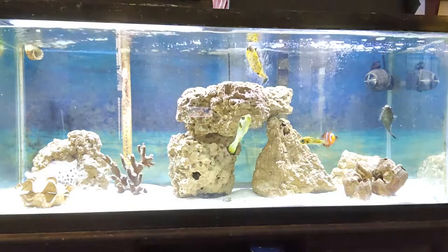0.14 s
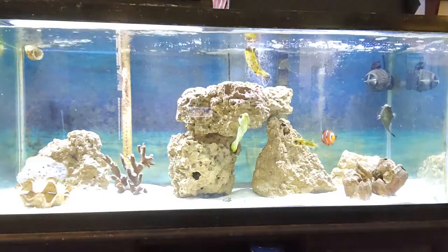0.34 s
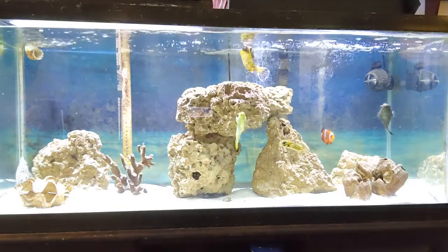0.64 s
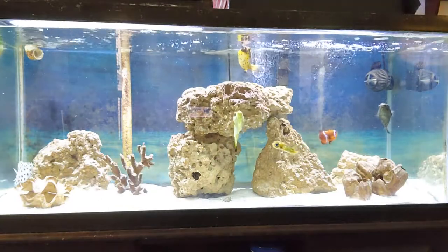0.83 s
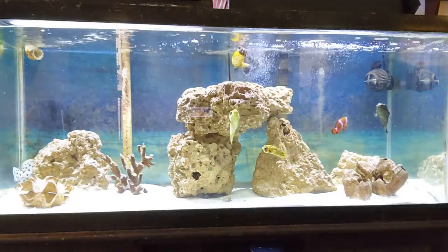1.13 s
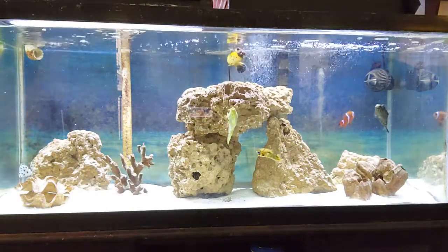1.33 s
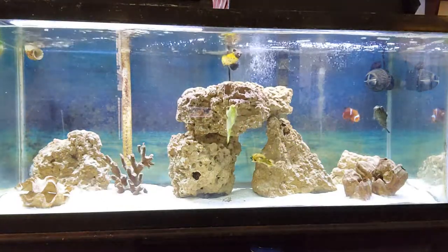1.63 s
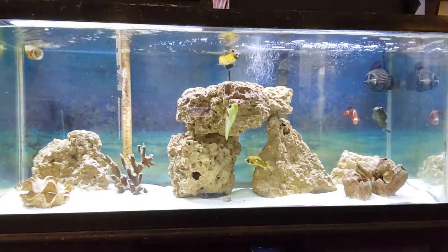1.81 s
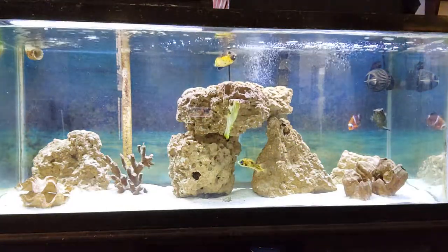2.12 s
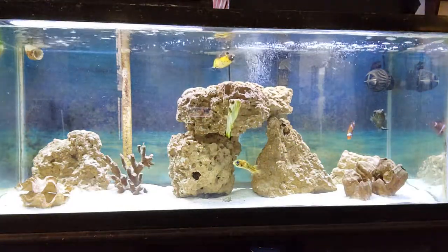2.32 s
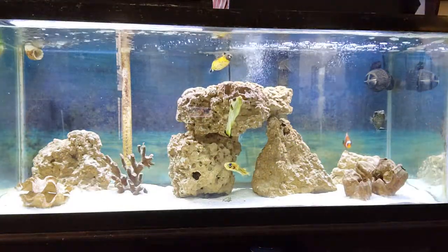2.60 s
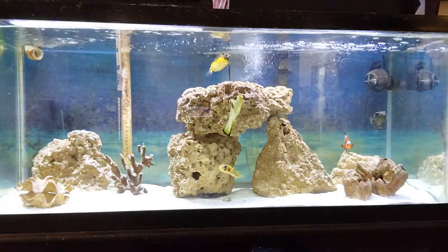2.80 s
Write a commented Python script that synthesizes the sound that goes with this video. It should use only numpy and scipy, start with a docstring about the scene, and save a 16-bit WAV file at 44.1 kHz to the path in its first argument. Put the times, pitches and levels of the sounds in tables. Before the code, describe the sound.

An aquarium pump hums low and steadily throughout, over soft rumble, faint water hiss and trickling small bubbles. Tiny sprays and a drip come in the first 0.3 s. To the right, something hard is set down with a quick rattle at 0.6 s, wood knocks from 1.0 to 1.5 s, and small glass or metal clinks at 1.3-1.5 s. Light drips follow until 2.8 s. Small-room stereo.

```python
"""A fish tank indoors, heard by two microphone ports: pumps hum on the mains over a low rumble all along,
water hisses and small bubbles trickle. Sprays and a drip open the scene; to the right, in the room,
something hard is set down at 0.6 s, wood is knocked from 1.0 s and a small glass or metal thing clinks
from 1.3 s; more drips and a spray end it. Objects ring as decaying modes, bubbles as short rising tones,
hum as steady sines, water and rumble as shaped noise."""
import sys
import numpy as np
from scipy import signal
from scipy.fft import rfft, irfft
from scipy.io import wavfile
from scipy.ndimage import uniform_filter1d

SR = 44100
rng = np.random.default_rng(int(sys.argv[2]) if len(sys.argv) > 2 else 0)


def nominal_scale(level):
    """Amplitude ratio for a level in decibels (scalar or array-like)."""
    x = np.asarray(level, float) / 20
    return 10 ** x


def dump(signal):
    """Clip the signal to [-1, 1] and save it as 16-bit WAV at the path in sys.argv[1]."""
    limited = np.clip(np.atleast_2d(signal).T, -1, 1)
    pcm = np.round(limited * 32767).astype(np.int16)
    wavfile.write(sys.argv[1], SR, pcm)


N = 130095


def evened(x):
    """Scales a signal to rms 1."""
    return x / np.sqrt(np.mean(x ** 2) + 1e-20)


def read(points, hz):
    """Reads a table along a log-frequency axis, flat beyond its ends."""
    f, value = np.transpose(points)
    return np.interp(np.log(hz + 1), np.log(f + 1), value, left=value[0], right=value[-1])


def add(mix, s, sound):
    """Mixes a sound in at a time in seconds."""
    part = mix[..., round(s * SR):][..., :sound.shape[-1]]
    part += sound[..., :part.shape[-1]]


def slow(top_hz, t):
    """Slow random drift of rms 1: sines from 0.3 Hz up, weaker as they get faster."""
    rates = np.geomspace(.3, top_hz, num=20)
    return evened(sum(np.sin(2 * np.pi * (f * t + rng.random())) / np.sqrt(f) for f in rates))


def coloured(points, length):
    """A short piece of noise of rms 1 with a given spectrum."""
    spectrum = rfft(rng.standard_normal(length))
    return evened(irfft(spectrum * nominal_scale(read(points, np.fft.rfftfreq(length, 1 / SR))), length))


# how long the room rings: (frequency [Hz], 60 dB decay time [s])
ROOM_DECAY = [(250, .45), (600, .42), (1200, .3), (4000, .3), (9000, .24), (16000, .18)]


def room(x):
    """Echoes of the room: sparse taps of random sign, each band dying at its own speed."""
    taps = np.zeros((2, SR // 2))
    slots = np.arange(160, SR // 2 - 20, 20)
    at = slots + rng.integers(0, 20, (2, len(slots)))
    np.put_along_axis(taps, at, rng.choice([-1., 1.], at.shape), 1)
    hz, t, z = signal.stft(taps, SR, nperseg=256)
    decay = nominal_scale(-60 * t / read(ROOM_DECAY, hz)[:, None])
    tail = signal.istft(z * decay, SR, nperseg=256)[1]
    return signal.fftconvolve(x[None], tail / np.linalg.norm(tail[0]), axes=1)[:, :N]


def placed(x):
    """From the right: the left port hears it later and softer; every object has its own echoes."""
    left_lag_samples, left_db = 19, -4.5
    echo_db = -7 + np.array([[-3], [0]])  # echoes, too, are softer on the left
    direct = np.array([nominal_scale(left_db) * np.roll(x, left_lag_samples), x])
    return direct + nominal_scale(echo_db) * room(x)


# spectrum of the noise of a contact: (frequency [Hz], relative level [dB per Hz])
CRACK_SPECTRUM = [(300, -14), (1500, -5), (3000, 0), (4800, -2), (7500, -11), (11000, -16), (16000, -17),
                  (16700, -60)]


def struck(modes, blows, knee_hz):
    """A contact and a short rattle crack and ring every mode, harder blows the upper ones more."""
    contact_s = .001
    rattle_db, rattles_per_s = -8, 700  # rattle fades from this level against the first contact
    chatter, chatter_hz = .35, 90  # a loose object wobbles on its seat: share and speed of each mode's flutter
    t, out = np.arange(SR // 3) / SR, np.zeros(N)
    hz, mode_db, t60 = np.transpose(modes)[..., None]
    octaves = np.log2(hz / knee_hz)
    knots = np.arange(0, t[-1], 1 / chatter_hz)
    signs = (-1) ** np.arange(len(modes))[:, None]
    for s, ring_db, hard_db, crack_db, rattle_s in blows:
        # complex flutter moves both strength and phase, growing from none at the blow
        wobble = rng.standard_normal((len(modes), len(knots), 2)) @ [1, 1j]
        wobble = wobble * np.minimum(knots * chatter_hz, 1)
        flutter = 1 + chatter * np.array([np.interp(t, knots, w) for w in wobble])
        # a positive hardness also thins the modes below the knee
        tilt_db = np.where(octaves > 0, hard_db, max(hard_db, 0)) * octaves
        tones = (flutter * np.exp(2j * np.pi * hz * t)).imag * signs
        ring = (nominal_scale(mode_db + tilt_db - 60 * t / t60) * tones).sum(0)
        ring = np.minimum(t / contact_s, 1) * ring

        fade = np.exp(-t / rattle_s)
        hits = rng.random(len(t)) < rattles_per_s / SR
        contacts = nominal_scale(rattle_db) * fade * rng.standard_normal(len(t)) * hits
        contacts[0] = 1
        contacts /= np.linalg.norm(contacts)

        # the crack noise thickens around each contact
        grit = .5 + uniform_filter1d(abs(contacts), size=40) * 40
        spectrum = [(f, c + hard_db * max(np.log2(f / knee_hz), 0)) for f, c in CRACK_SPECTRUM]
        envelope = fade * grit * np.minimum(t / contact_s / 2, 1)
        crack = nominal_scale(crack_db) * envelope * coloured(spectrum, len(t))
        add(out, s, nominal_scale(ring_db) * signal.fftconvolve(contacts, ring)[:len(t)] + crack)
    return out


# modes of the hard thing: (frequency [Hz], relative level [dB], 60 dB decay time [s])
DISH_MODES = [(422, 4, 0.051), (1150, -1.5, 0.055), (1340, 7, 0.028), (2084, -7.5, 0.067), (2333, 0, .09),
              (2400, -8.5, 0.069), (3190, -5, .04), (3428, 0.5, 0.045), (4480, -8.5, 0.053),
              (5410, -8, 0.078), (5750, -7, 0.038), (6005, 1.5, 0.035), (6180, -12, .04),
              (9100, -14, 0.052)]
# its blows: (time [s], ring level [dB], hardness [dB per octave from the knee], crack level [dB],
# rattle fade [s])
DISH_BLOWS = [(0.63, -37.5, 0.5, -35.5, 0.0074), (.643, -37.5, 1.5, -63, 0.0072),
              (.653, -40.5, 1.5, -40, 0.028), (.682, -52.5, -3, -54, 0.016)]


def dish():
    """Something hard is set down to the right; its short modes ring together."""
    return placed(struck(DISH_MODES, DISH_BLOWS, knee_hz=5000))


# modes of the wood: (frequency [Hz], relative level [dB], 60 dB decay time [s])
WOOD_MODES = [(452, 3, 0.056), (550.4, -2.5, 0.12), (653, 0, 0.087), (787, -6, 0.044), (967, -5, 0.11),
              (1120.7, -2, .11), (1216, -2, 0.029), (1373, -7.5, .05), (1780, -9, .03), (1940, -14, 0.056),
              (2517, -14, 0.021)]
# its knocks: (time [s], ring level [dB], hardness [dB per octave from the knee], crack level [dB],
# rattle fade [s])
WOOD_BLOWS = [(1.0143, -35.5, 1.5, -55, 0.0033), (1.023, -39.5, 1.5, -62, 0.012),
              (1.073, -55, -16, -73, .005), (1.265, -46, 10.5, -86, .012), (1.346, -37.5, 7.5, -59, 0.0023),
              (1.356, -38.5, 5.5, -54, 0.0086), (1.419, -45.5, 11.5, -53.5, 0.012),
              (1.521, -47, 8.5, -63, 0.041)]


def wood():
    """Wood is knocked to the right; its modes lie low."""
    return placed(struck(WOOD_MODES, WOOD_BLOWS, knee_hz=800))


# modes of the small glass or metal thing: (frequency [Hz], relative level [dB], 60 dB decay time [s])
GLASS_MODES = [(1298, -8.5, 0.1), (1890, -24, 0.094), (2484, -22, 0.088), (2800, -28, 0.059),
               (3040, -3, 0.03), (3224, -8, 0.18), (3284, 1.5, 0.052), (5800, -8, 0.045),
               (5740, -26.5, 0.32), (5880, -2, 0.068), (6040, -10, 0.057), (6950, -17, 0.077),
               (8940, -10, 0.052), (12770, -14.5, 0.036), (13580, -20, 0.11), (15120, -17, .04),
               (15400, -15, 0.035)]
# its clinks: (time [s], ring level [dB], hardness [dB per octave from the knee], crack level [dB],
# rattle fade [s])
GLASS_BLOWS = [(1.2658, -34, 1.5, -26, 0.002), (1.358, -42.5, -4.5, -58, 0.015),
               (1.41, -36.5, -13, -34.5, 0.0092), (1.52, -34, -11, -42, 0.0067),
               (1.528, -37.5, -10, -54, 0.015)]


def glass():
    """A small glass or metal thing clinks to the right; its modes reach far into the treble."""
    return placed(struck(GLASS_MODES, GLASS_BLOWS, knee_hz=6000))


def blip(hz, cycles):
    """A bubble: soft start, slight rise in pitch, quick fade."""
    u = np.arange(0, 4 * cycles / hz, 1 / SR) * hz / cycles  # time in units of the given cycles
    envelope = (1 - np.exp(-3 * u)) * np.exp(-2 * u)
    return envelope * np.sin(2 * np.pi * cycles * (u + .004 * u ** 2))


# single drips: (time [s], level before the envelope [dB], starting pitch [Hz])
DRIPS = [(.088, -46.5, 3950), (1.743, -47.5, 4380), (2.38, -56, 2320), (2.621, -51, 5220),
         (2.777, -56, 5240), (2.82, -45.5, 2068)]


def drips():
    """Each drip rings one bubble, equally in both ports."""
    out = np.zeros((2, N))
    for s, db, hz in DRIPS:
        add(out, s, nominal_scale(db) * blip(hz, cycles=28) * np.ones((2, 1)))
    return out


# soft sprays of the surface: (time [s], level before the fade [dB], fade time constant [s], lowest [Hz])
SPRAYS = [(0.085, -67, 0.024, 3500), (0.203, -68.5, 0.013, 5500), (0.249, -65.5, 0.011, 5950),
          (0.769, -76, .015, 8900), (0.903, -71, 0.026, 4930), (2.126, -73.5, 0.028, 5960)]


def sprays():
    """Short bright puffs of noise, independent in the two ports."""
    out = np.zeros((2, N))
    t = np.arange(4000) / SR
    for s, db, length, low_hz in SPRAYS:
        spectrum = [(low_hz * .6, -25), (low_hz, 0), (16000, -9)]
        puff = np.array([coloured(spectrum, len(t)) for _ in out])
        add(out, s, nominal_scale(db) * np.minimum(t / 0.0018, 1) * np.exp(-t / length) * puff)
    return out


def surface():
    """Drips and sprays at the water surface, with the room's echoes of both."""
    out = drips() + sprays()
    return out + nominal_scale(-9) * room(out.mean(0))


def bubbles():
    """Trickle: small bubbles of many sizes ring at random, some stronger, spread between the ports."""
    per_s, level_db, sizes = 700, -68.5, 110
    lowest_hz, middle_hz, highest_hz = 900, 3400, 6300
    out = np.zeros((2, N))
    for v in rng.random((sizes, 4)):
        hz = np.interp((v[0] + v[1] + v[3]) / 3, [0, .5, 1], [lowest_hz, middle_hz, highest_hz])
        strength_db = 3.5 * np.minimum(rng.exponential(1, N), 3)
        train = (rng.random(N) < per_s / sizes / SR) * nominal_scale(strength_db)
        ringing = signal.oaconvolve(train, blip(hz, cycles=35))[:N]
        out += ringing * np.sqrt([[v[2]], [1 - v[2]]])
    return nominal_scale(level_db) * evened(out + room(out[0]) - room(out[1]))


# likeness of the two ports: (frequency [Hz], coherence [0 to 1])
PORT_LIKENESS = [(60, 1), (130, 0.89), (290, 1), (640, 0.45), (1410, 0.028), (3100, 0.073), (6820, 0.032),
                 (15000, 0.16)]
# phase between the ports: (frequency [Hz], lead of the left [radians])
PORT_LEAD = [(40, 0.62), (300, 0.39), (1000, 0.037)]
# balance of the ports: (frequency [Hz], left over right [dB])
PORT_TILT = [(30, -2), (180, 1.5), (550, -1), (1650, 0), (15000, 1.5)]


def wash(points, db, patchy_db, swell_db, size):
    """Random short-time spectra with patches and a swell, as two microphone ports hear them."""
    hop = size // 4
    frames, hz = N // hop + 5, np.fft.rfftfreq(size, 1 / SR)[:, None]
    a, b, c, d, patches = rng.standard_normal((frames, len(hz), 5)).T
    patches = uniform_filter1d(patches, size=3, axis=0)  # over frequency, then time
    patches = evened(uniform_filter1d(patches, size=3500 // hop, axis=1))
    same = np.clip(read(PORT_LIKENESS, hz), 0, 1)
    left = a + 1j * b
    right = same * left + np.sqrt(1 - same ** 2) * (c + 1j * d)
    right = right * np.exp(-1j * read(PORT_LEAD, hz))
    tilt_db = read(PORT_TILT, hz)
    z = np.array([left * nominal_scale(tilt_db / 2), right * nominal_scale(-tilt_db / 2)])
    # the spectrum falls away beyond both ends of the table
    below = (points[0][0] / 2, points[0][1] - 40)
    above = (points[-1][0] * 1.3, points[-1][1] - 30)
    closed = [below] + list(points) + [above]
    swell = slow(3.5, np.arange(frames) * hop / SR)
    z *= nominal_scale(read(closed, hz) + patchy_db * patches + swell_db * swell)
    return nominal_scale(db) * evened(signal.istft(z, nperseg=size, noverlap=size - hop)[1][:, :N])


# spectrum of the water hiss: (frequency [Hz], relative level [dB per Hz])
WATER_SPECTRUM = [(290, -26), (500, -18), (545, -1), (773, -12), (1420, -7.5), (1670, -11), (2100, -10),
                  (2730, -22), (3490, -9), (5310, -32.5), (6330, -25), (12900, -39), (16000, -49.5)]


def water():
    """Hiss of the water as patchy noise."""
    return wash(WATER_SPECTRUM, db=-66.5, patchy_db=3.5, swell_db=.5, size=512)


# lines of the pump hum: (multiple of mains, level [dB], lead of the left [radians], left over right [dB])
HUM_LINES = [(1, -65.5, 0.45, 5), (2, -47.5, 0.3, 0.6), (3, -61.5, 0.067, -1), (4, -64, -0.23, -1.7),
             (5, -76.5, -1.22, 12), (8, -79.5, 0.5, 4), (10, -77.5, 0.87, 1.5)]


def hum():
    """Pumps hum at steady mains multiples; the weaker a line, the more it wavers."""
    mains_hz, waver_db = 59.977, 0.9
    t, out = np.arange(N) / SR, np.zeros((2, N))
    side = np.array([[.5], [-.5]])  # half of each difference to either port
    strongest_db = HUM_LINES[1][1]
    for multiple, db, lead, pan_db in HUM_LINES:
        drift = np.interp(t, t[::200], slow(5.77, t[::200]))
        waver = waver_db * (0.5 + 0.17 * (strongest_db - db)) * drift
        tone = np.cos(2 * np.pi * multiple * mains_hz * t + side * lead)
        out += np.sqrt(2) * nominal_scale(db + waver + side * pan_db) * tone
    return out


# spectrum of the pump and room rumble: (frequency [Hz], relative level [dB per Hz])
RUMBLE_SPECTRUM = [(20, -14.5), (35, -11), (55, 2.5), (80, -2), (100, -22), (140, -9), (200, -8.5),
                   (280, -8.5), (350, -18), (450, -14), (650, -23), (900, -26.5)]


def rumble():
    """Low rumble of pumps and room as patchy noise."""
    return wash(RUMBLE_SPECTRUM, db=-55.5, patchy_db=3.0, swell_db=.5, size=2048)


def scene():
    """Blows from the right over the sounds of the tank."""
    blows = dish() + wood() + glass()
    tank = surface() + bubbles() + water() + hum() + rumble()
    return blows + tank


def low_pass(x):
    """Removes everything above the highest recorded frequency."""
    return signal.sosfilt(signal.butter(12, 16150, fs=SR, output="sos"), x)


def record(dry):
    """Stores the finished stereo mix of the two ports."""
    return low_pass(dry)


dry = scene()
out = record(dry)
dump(out)
```